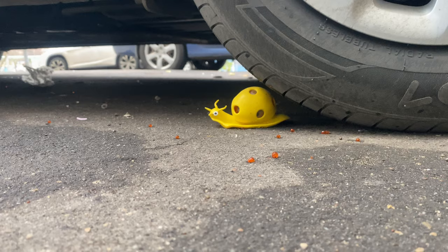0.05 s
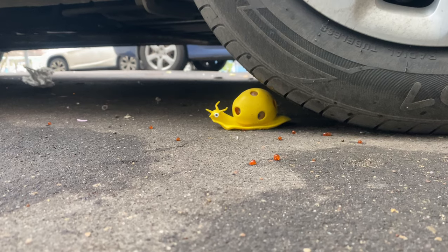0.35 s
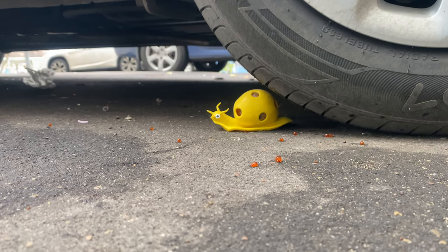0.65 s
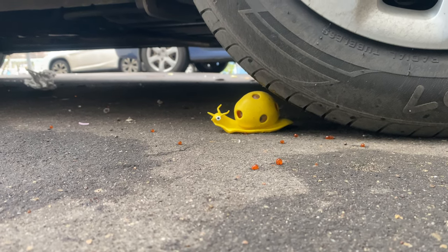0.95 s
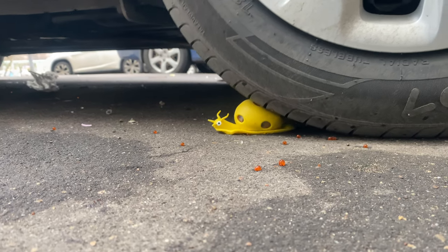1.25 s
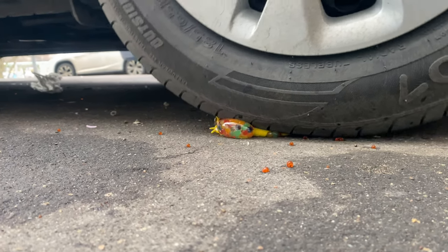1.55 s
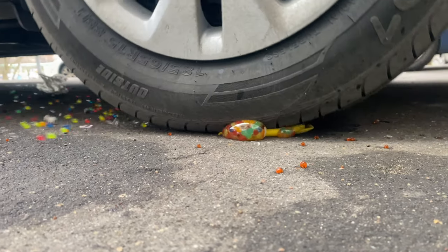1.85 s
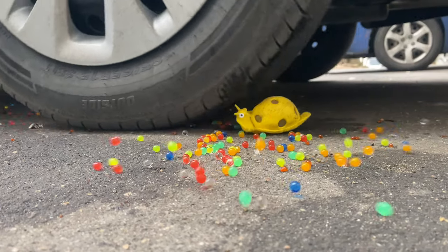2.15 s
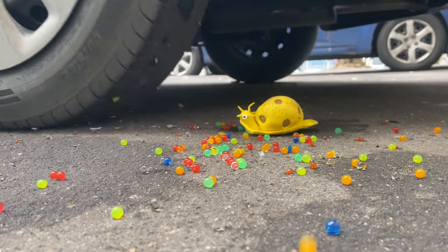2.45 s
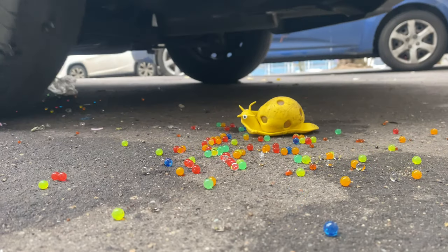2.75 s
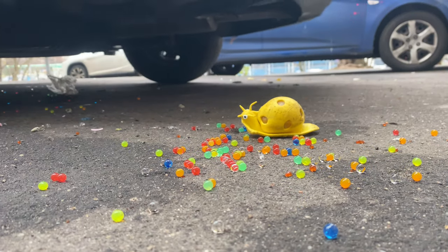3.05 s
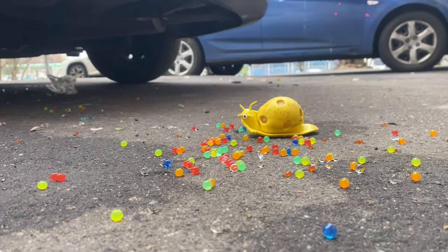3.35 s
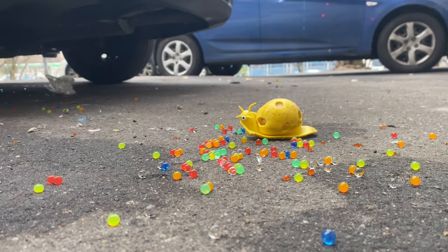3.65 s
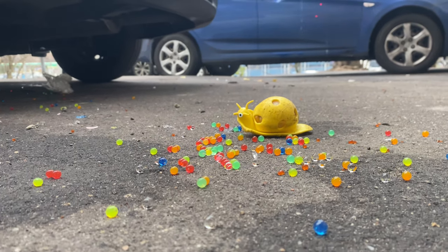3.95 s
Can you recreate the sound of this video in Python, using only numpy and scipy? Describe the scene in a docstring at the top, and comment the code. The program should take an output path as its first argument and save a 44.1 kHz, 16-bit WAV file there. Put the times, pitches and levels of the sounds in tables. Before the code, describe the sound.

Close crunching and two sharp pops as a rumbling car rolls over a bead-filled toy.

```python
"""Car bursting a bead-filled toy

A car creeps over asphalt, engine running, and rolls over a hollow soft toy full of beads, close by.
The beads crunch, the shell cracks, the skin pops, air and beads squirt through the split in a hiss
and a few squelches, and a last pop follows. A limiter ducks the engine under the bursts.
Loose beads and grit tick on the ground, and faint squeaks sound far off."""
import sys
import numpy as np
from scipy import signal
from scipy.fft import rfft, irfft
from scipy.io import wavfile
from scipy.ndimage import uniform_filter1d

SR = 44100
rng = np.random.default_rng(int(sys.argv[2]) if len(sys.argv) > 2 else 0)


def file_out(sig):
    """Save sig as 16-bit WAV at sys.argv[1]."""
    # one column per channel
    cols = np.atleast_2d(sig).T
    # limit, then scale
    lim = np.clip(cols, -1, 1)
    pcm = np.round(lim * 32767).astype(np.int16)
    wavfile.write(sys.argv[1], SR, pcm)


N = 176400
T = np.arange(N) / SR
BIN_HZ = np.arange(N // 2 + 1) * SR / N
LEFT_RIGHT = np.array([[1], [-1]])


def from_db(db):
    """Decibels to gain."""
    return 10 ** (np.asarray(db) / 20)


def rms_one(x):
    """Scale to unit rms."""
    return x / np.sqrt(np.mean(x ** 2) + 1e-20)


def in_time(rows):
    """Each column of an automation curve, at every sample."""
    times, *columns = np.transpose(rows)
    return [np.interp(T, times, column) for column in columns]


def passage(rows):
    """Gains of a level curve, silent outside its span."""
    return [from_db(db) * (T > rows[0][0]) * (T < rows[-1][0]) for db in in_time(rows)]


def per_bin(points):
    """A curve over log frequency, at every FFT bin."""
    hz, value = np.transpose(points)
    return np.interp(np.log(np.maximum(BIN_HZ, SR / N)), np.log(hz), value)


def colour(x, eq):
    """Minimum-phase EQ that keeps the power of white noise."""
    cepstrum = irfft(np.log(rms_one(from_db(per_bin(eq)))), N)
    cepstrum[1:N // 2] *= 2
    cepstrum[N // 2 + 1:] = 0
    return irfft(rfft(x) * np.exp(rfft(cepstrum)), N)


def drift(rate_hz):
    """Smooth random modulation, rms 1."""
    return rms_one(irfft(rfft(rng.standard_normal(N)) / (1 + (BIN_HZ / rate_hz) ** 2), N))


def resonate(x, hz, width_hz):
    """A resonance with peak gain 1."""
    r = np.exp(-np.pi * width_hz / SR)
    feedback = [1, -2 * r * np.cos(2 * np.pi * hz / SR), r * r]
    return signal.lfilter(np.array([1, 0, -1]) * (1 - r * r) / 2, feedback, x + 1e-18)


def gliding(x, hz, width_hz):
    """A resonance whose centre follows the curve hz; peak gain 1."""
    turn = np.exp(2j * np.pi * np.cumsum(hz) / SR)
    r = np.exp(-np.pi * width_hz / SR)
    return 2 * np.real(turn * signal.lfilter([1 - r], [1, -r], x * np.conj(turn) + 1e-18))


def burst(peak_s, rise_s, hold_s, decay_s):
    """Envelope: exponential rise, hold, exponential decay."""
    before = np.maximum(peak_s - T, 0) / rise_s
    after = np.maximum(T - peak_s - hold_s, 0) / decay_s
    return np.exp(-np.minimum(before + after, 40))


def wide_noise(eq):
    """Steady stereo noise, rms 1."""
    # left-right likeness: frequency_hz, correlation (clipped below)
    likeness = [(80, 0.96), (140, 0.87), (300, 0.51), (800, -.42), (2800, -0.14), (4300, 0.34),
                (5600, -0.26), (6800, 0.5), (8900, -1.085), (12200, 1), (15000, -1.1)]
    alike = np.clip(per_bin(likeness), -0.99, 0.99)
    mid, side = rfft(rng.standard_normal((2, N)))
    stereo = irfft(np.sqrt(1 + alike) * mid + np.sqrt(1 - alike) * side * LEFT_RIGHT, N)
    return rms_one(colour(stereo, eq))


def at_ports(noises, side, scatter=0.12, port_lag_s=0.0001715):
    """A direct sound reaches one microphone port late; each port adds its own scattered share."""
    lag_s = side * port_lag_s / 2 * LEFT_RIGHT
    direct = irfft(rfft(noises[0]) * np.exp(-2j * np.pi * BIN_HZ * lag_s), N)
    return np.sqrt(1 - scatter) * direct + np.sqrt(scatter) * noises[1:]


def air(side, scatter=0.12):
    """White turbulence from the left (-1) or right (1)."""
    return at_ports(rng.standard_normal((3, N)), side, scatter)


def engine(wobble=0.01, rough_db=2.6, rumble_db=-33, rumble_follows=0.13):
    """Uneven firing makes a drone that swells briefly; the low rumble follows it a little."""
    # firing tone: time_s, pitch_hz, level_db
    firing = [(0.06, 76.2, -37.5), (0.45, 69.9, -43.5), (0.62, 77.74, -39.5), (0.85, 71.32, -33.5),
              (1.0, 73.6, -31.5), (1.2, 78, -38.5), (1.45, 75.7, -37), (1.92, 74, -43.5), (2.15, 76, -34.5),
              (2.4, 78.9, -31.5), (2.68, 77.15, -36.5), (2.8, 77.72, -40), (3.1, 79.7, -35),
              (3.46, 82.17, -37), (3.62, 74.1, -43), (4.0, 74.9, -36)]
    # swells and one dip of the drone: centre_s, half_width_s, gain_db
    swells = [(0.058, 0.042, 15.5), (0.27, 0.023, 14.5), (0.83, 0.035, 3.5), (1.11, .03, 7.5),
              (2.5, 0.032, 9), (2.895, 0.041, 8.5), (3.02, .045, 8.5), (3.14, 0.038, -4), (3.27, .05, 6.5),
              (3.445, 0.031, 11), (3.705, 0.023, 9)]
    # engine partials: pitch_multiple, gain_db
    orders = [(1, -2), (1.5, -13.5), (2, -18), (3, -16)]
    # rumble under the car: frequency_hz, gain_db
    rumble_eq = [(15, -14), (28, 0.5), (38, -13), (52, 0), (75, -1), (115, -1), (160, -7), (235, -7.5),
                 (300, -25.5), (600, -34), (2000, -75)]
    hz, level_db = in_time(firing)
    swell_db = sum(db * np.exp(-((T - s) / width) ** 2) for s, width, db in swells)
    phase = 2 * np.pi * np.cumsum(hz * (1 + wobble * drift(7.5))) / SR
    drone = 0
    for multiple, db in orders:
        gain = np.sqrt(2) * from_db(level_db + swell_db + db + rough_db * drift(49))
        drone += gain * np.sin(multiple * phase + rng.uniform(0, 2 * np.pi))
    return drone + from_db(rumble_db + rumble_follows * swell_db) * wide_noise(rumble_eq)


def rush(flutter_db=1.16):
    """Fan and tyres make a wide, lightly fluttering bed of noise."""
    # fader of the rush: time_s, level_db
    fader = [(0, -36.5), (1.4, -36), (2.1, -36.5), (2.8, -36.5), (3.55, -36.5), (4, -37.5)]
    # tone of the rush: frequency_hz, gain_db
    eq = [(60, -11), (250, 2), (450, 0), (900, 0.5), (1350, -7), (1900, -9.5), (2500, -16), (4000, -22.5),
          (6000, -23.5), (8500, -31.5), (15500, -31)]
    return from_db(in_time(fader)[0] + flutter_db * drift(18)) * wide_noise(eq)


def tread():
    """Tread hisses on the asphalt and fades as the wheel leaves."""
    # fader of the hiss: time_s, level_db
    fader = [(0, -52), (1.3, -56), (1.45, -52.5), (1.9, -49), (2.1, -63), (3.1, -62), (3.55, -63.5),
             (4, -68)]
    # tone of the hiss: frequency_hz, gain_db
    eq = [(500, -20), (3000, -2.5), (6000, -2), (10000, -2.5), (15500, -13)]
    return from_db(in_time(fader)[0]) * wide_noise(eq)


def squeaks(edge_s=0.0024, waver_hz=45, rough_db=3):
    """Faint far-off squeaks: short, rough, wavering tones with a weak octave."""
    # squeaks: start_s, length_s, pitch_hz, level_db, octave_relative_db
    cues = [(0.125, 0.09, 4370, -56.5, -30), (3.531, 0.018, 980, -37.5, -9), (3.599, 0.035, 960, -47, -8),
            (3.65, 0.01, 840, -48, -5), (3.688, 0.011, 900, -44, -12), (3.718, 0.017, 1010, -47, -14)]
    waver = np.cumsum(waver_hz * drift(159.5)) / SR
    tones = 0
    for s, length, hz, db, octave_db in cues:
        phase = 2 * np.pi * (hz * T + waver)
        tone = np.sin(phase) + from_db(octave_db) * np.sin(2 * phase)
        tones += np.sqrt(2) * from_db(db) * burst(s, edge_s, length, edge_s) * tone
    return tones * from_db(rough_db * drift(200))


def contacts(hits, eq, rise_s=0.00091, hold_s=0.00024):
    """Small impacts, each a quickly dying burst of noise."""
    envelope = sum(from_db(db) * burst(s, rise_s, hold_s, decay) for s, db, decay in hits)
    return colour(air(side=0.98) * envelope, eq)


def knocks():
    """Toy and tyre knock dully."""
    # knocks: peak_s, level_db, decay_s
    hits = [(1.0938, -20.5, 0.0019), (2.1035, -30.5, 0.0046)]
    # tone of a knock: frequency_hz, gain_db
    eq = [(80, -11), (550, 7), (1000, 3), (1700, -4), (2600, -4), (3700, -7.5), (7000, -27), (15000, -34)]
    return contacts(hits, eq)


def crackle(per_s=6000, spread_db=2.5, ring_cycles=8, pitch_count=24):
    """Clicking beads: random clicks, each ringing briefly at one of many pitches; rms 1."""
    sizes = from_db(spread_db * np.minimum(rng.exponential(1, N), 4))
    clicks = sizes * rng.choice([-1, 1], N) * (rng.random(N) < per_s / SR)
    pitch_index = rng.integers(0, pitch_count, N)
    return rms_one(sum(resonate(clicks * (pitch_index == k), hz, 2 * hz / ring_cycles)
                       for k, hz in enumerate(np.geomspace(700, 15000, pitch_count))))


def crunch(rise_s=0.00088, width_hz=840):
    """Beads grind under the tyre's load, and the shell gives in pitched cracks; later, beads spray out of the
    split along with the squelches."""
    # fader of the grinding, and of the bead spray from about 1.76 s: time_s, level_db
    fader = [(1.33, -53), (1.47, -52.5), (1.511, -45), (1.523, -26), (1.53, -33), (1.54, -25), (1.559, -28),
             (1.573, -41), (1.587, -38.5), (1.612, -32), (1.66, -40.5), (1.755, -51), (1.777, -22.5),
             (1.811, -18.5), (1.83, -32), (1.88, -54), (1.95, -53)]
    # tone of the grinding and the spray: frequency_hz, gain_db
    eq = [(200, -26), (1200, -10), (2600, 5), (3600, 0), (5000, -4.5), (7000, -15.5), (11800, -11.5),
          (15500, -21)]
    # shell cracks: peak_s, level_db, decay_s, pitch_hz
    cracks = [(1.5227, -18, .003, 5360), (1.5402, -17, 0.0023, 5700), (1.547, -17, 0.0024, 4000),
              (1.5543, -15, 0.0019, 3550), (1.561, -20, .002, 2500), (1.571, -22, 0.0017, 5960)]
    grains = at_ports(np.array([crackle() for _ in range(3)]), side=0.96)
    shell = sum(resonate(grains * from_db(db) * burst(s, rise_s, 0, decay), hz, width_hz)
                for s, db, decay, hz in cracks)
    return colour(passage(fader)[0] * grains, eq) + shell


def ticks():
    """Grit and loose beads tick on the ground."""
    # ticks: peak_s, level_db, decay_s
    hits = [(1.41, -30.5, 0.0013), (1.468, -45, .001), (1.481, -31, 0.0011), (1.487, -33, .001),
            (1.4975, -27, 0.0024), (1.9462, -34, 0.00091), (2.0784, -44, 0.00098), (2.4495, -32.5, 0.0013),
            (3.6, -40.5, 0.0048)]
    # tone of a tick: frequency_hz, gain_db
    eq = [(500, -2.5), (3500, -7), (6000, -13), (9000, -12.5), (15000, -15.5)]
    return contacts(hits, eq)


def pops(rise_s=0.000067, hold_s=0.00069, click_delay_s=0.00072, puff_db=-20, puff_decay_s=0.016):
    """The skin tears: a bright crack, a pressure pulse, and a knock and puff that ring the body."""
    # tears: peak_s, level_db, decay_s, pulse_relative_db, knock_relative_db
    tears = [(1.5929, -1.5, 0.005, -10, 9.5), (1.8558, 2, 0.0016, 5.5, -22)]
    # tone of the crack: frequency_hz, gain_db
    crack_eq = [(100, -26), (500, -7), (1800, 3), (2500, -1.5), (3500, -2.5), (6200, 1), (7600, -3.5),
                (11000, 5), (13500, -1.5), (16000, -4)]
    # tone of the pressure pulse: frequency_hz, gain_db
    pulse_eq = [(100, -17), (400, 4), (800, 4.5), (1300, 0.5), (1950, -1), (2600, -20), (6000, -35)]
    # resonances of the hollow body: pitch_hz, width_hz, gain_db
    body_modes = [(220, 82, 18), (730, 86, 14.5), (1330, 350, 8), (1870, 270, 8), (3220, 120, 12.5),
                  (5530, 320, 4)]
    crack = pulse = knock = puff = 0
    for s, db, decay, pulse_db, knock_db in tears:
        click = np.arange(N) == int((s + click_delay_s) * SR)
        crack += from_db(db) * burst(s, rise_s, hold_s, decay)
        pulse += from_db(db + pulse_db) * click
        knock += from_db(db + knock_db) * click
        puff += from_db(db + knock_db + puff_db) * burst(s, rise_s, hold_s, puff_decay_s)
    drive = knock + puff * air(side=-0.87)
    hollow = sum(from_db(db) * resonate(drive, hz, width) for hz, width, db in body_modes)
    return colour(crack * air(side=-0.957), crack_eq) + colour(pulse, pulse_eq) + hollow


def split_ring(x, modes):
    """The resonances of the split slide together as it stretches and slackens."""
    # pitch bend of the split: time_s, pitch_ratio
    bend = [(1.69, 1.3), (1.712, 0.83), (1.738, 0.91), (1.758, 0.86), (1.778, 0.96), (1.79, 1.04),
            (1.83, 0.87)]
    ratio = in_time(bend)[0]
    return sum((-1) ** k * from_db(db) * gliding(x, hz * ratio, width)
               for k, (hz, width, db) in enumerate(modes))


def jet():
    """Air and spray fizz through the split, which gives them a hollow, sliding ring."""
    # faders of the jet: time_s, fizz_db, top_hiss_db
    faders = [(1.688, -63, -70), (1.693, -16.5, -44), (1.704, -20.5, -39), (1.71, -31, -35),
              (1.722, -20, -25), (1.738, -24, -19.5), (1.755, -26, -34), (1.765, -33, -36), (1.8, -30, -42),
              (1.85, -47, -59)]
    # tone of the fizz: frequency_hz, gain_db
    fizz_eq = [(80, -40), (900, -23), (1700, -16), (2900, -8), (3600, 8), (4600, -2.5), (6300, -10.5),
               (8500, 0), (11000, -12), (15500, -29)]
    # tone of the top hiss: frequency_hz, gain_db
    hiss_eq = [(2000, -49), (7000, -38), (11500, 3), (14500, 10), (15700, -6)]
    # resonances of the still narrow split: unbent_pitch_hz, width_hz, gain_db
    modes = [(2720, 200, 3), (3730, 300, 11), (4000, 420, 5.5)]
    fizz_gain, hiss_gain = passage(faders)
    fizz = fizz_gain * air(side=-0.98, scatter=0.054)
    hiss = hiss_gain * air(side=-0.96)
    return colour(fizz, fizz_eq) + split_ring(fizz, modes) + colour(hiss, hiss_eq)


def squelches(hold_s=0.00062, trim_db=-1.5):
    """Clumps of beads spit out and make the split ring."""
    # clumps: peak_s, level_db, rise_s, decay_s
    clumps = [(1.7783, -7.5, 0.0047, 0.0016), (1.788, 0.5, 0.00044, 0.0017), (1.792, -2, 0.0003, 0.0014),
              (1.798, -14, 0.0016, .003), (1.804, -14.5, 0.00055, 0.0016), (1.81, -12.5, 0.00071, 0.0018),
              (1.823, -23, 0.001, 0.0025)]
    # tone of a squelch: frequency_hz, gain_db
    eq = [(200, -23), (800, -21), (1300, -2), (1800, -8), (2700, 5.5), (4500, 6.5), (5600, -0.5),
          (7400, -5.5), (9000, -6), (15500, -6.5)]
    # resonances of the split: unbent_pitch_hz, width_hz, gain_db
    modes = [(2870, 350, 3), (3390, 260, 15), (4100, 380, 12), (4810, 300, 15.5), (7630, 460, 4.5)]
    envelope = sum(from_db(db) * burst(s, rise, hold_s, decay) for s, db, rise, decay in clumps)
    spit = envelope * air(side=1)
    return from_db(trim_db) * (colour(spit, eq) + split_ring(spit, modes))


def underbody(x, t60_s=0.2, wet_db=-21.5, damping_hz=4970):
    """Short dull reverb between the ground and the floor of the car."""
    t = T[:SR // 2]
    lowpass = signal.butter(1, damping_hz, fs=SR, output="sos")
    tail = signal.sosfilt(lowpass, rng.standard_normal((2, len(t)))) * from_db(-60 * t / t60_s)
    tail /= np.sqrt(np.sum(tail ** 2) / 2)
    return from_db(wet_db) * signal.fftconvolve(x, tail, axes=1)[:, :N]


def scene(toy_pan_db=-1.5, car_pan_db=-0.77):
    """The toy bursts under the passing car; pans are left minus right."""
    toy = crunch() + pops() + jet() + squelches() + knocks() + ticks()
    toy *= from_db(toy_pan_db / 2 * LEFT_RIGHT)
    car = (engine() + rush() + tread()) * from_db(car_pan_db / 2 * LEFT_RIGHT)
    return car + squeaks() + toy + underbody(toy)


def record(dry):
    """A fast limiter with slow release, soft clipping and a steep top cut."""
    threshold_db, release_db_per_s, window_s = -8, 51, 0.0008
    silent_until_s, cutoff_hz = 0.036, 15600
    window = int(window_s * SR)
    power = uniform_filter1d(np.mean(dry ** 2, axis=0), window)
    over_db = np.maximum(10 * np.log10(np.maximum(power, 1e-12)) - threshold_db, 0)
    release_db = release_db_per_s * T
    duck_db = np.maximum.accumulate(over_db + release_db) - release_db
    limited = np.tanh(dry * from_db(-uniform_filter1d(duck_db, window)))
    top_cut = signal.ellip(10, 0.1, 80, cutoff_hz, fs=SR, output="sos")
    return signal.sosfilt(top_cut, limited * (T > silent_until_s))


dry = scene()
out = record(dry)
file_out(out)
```